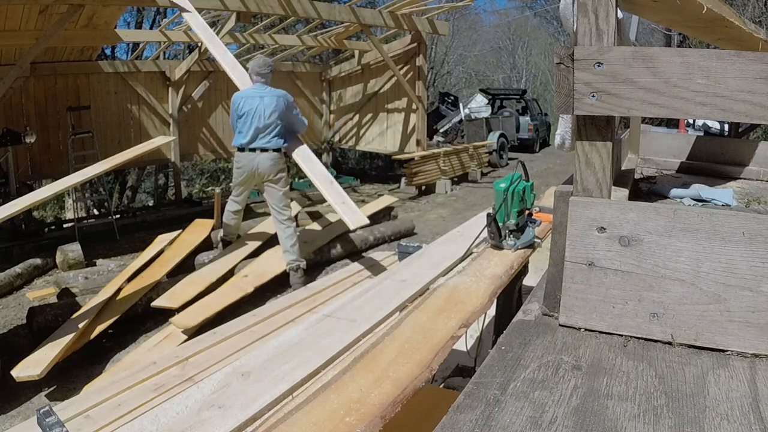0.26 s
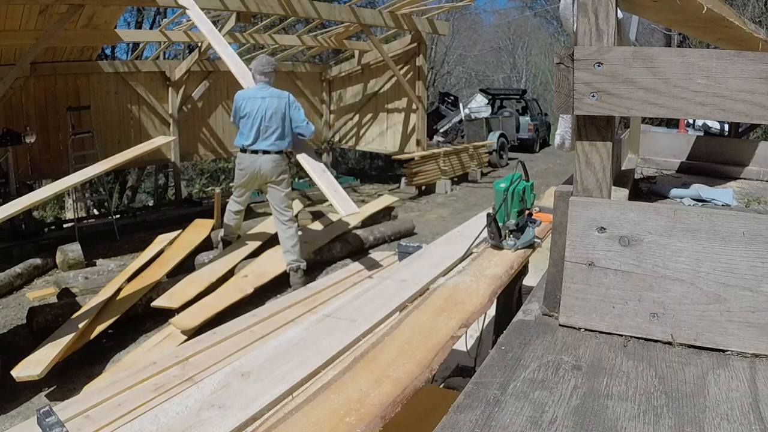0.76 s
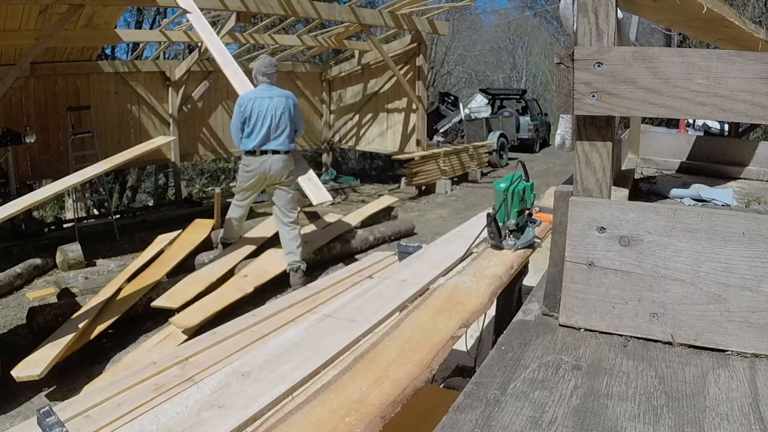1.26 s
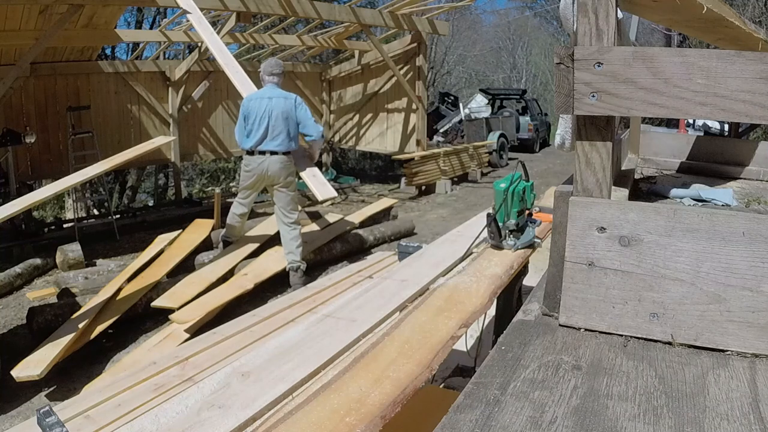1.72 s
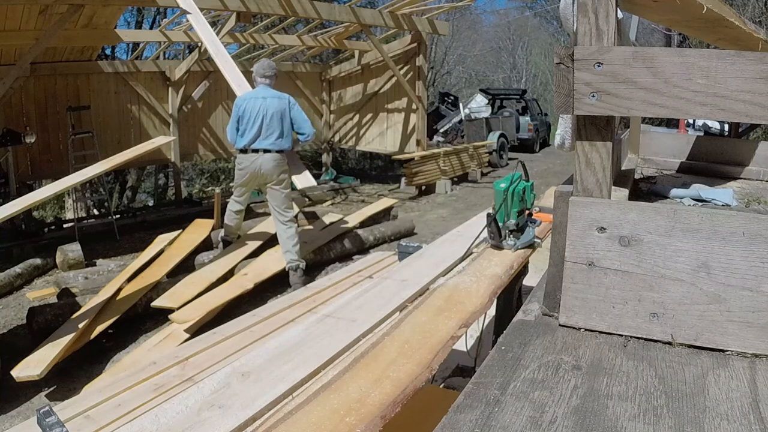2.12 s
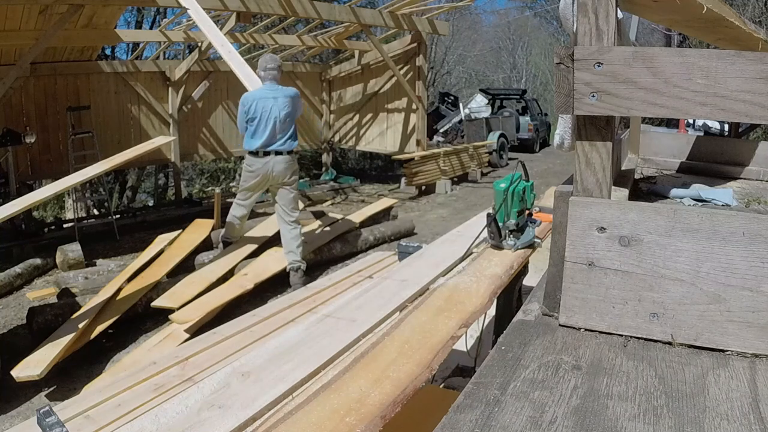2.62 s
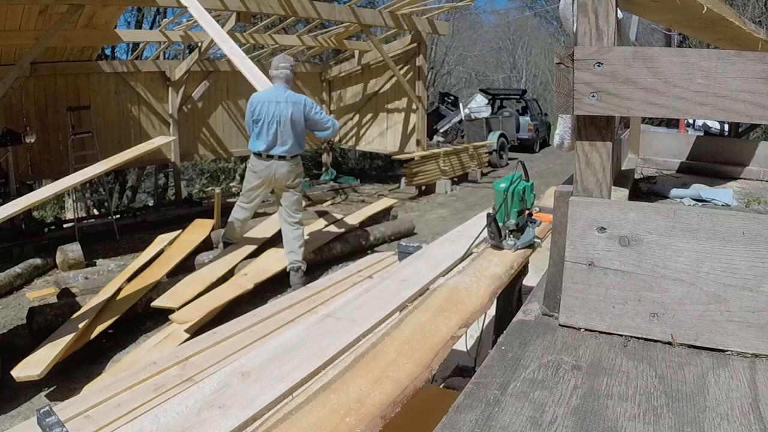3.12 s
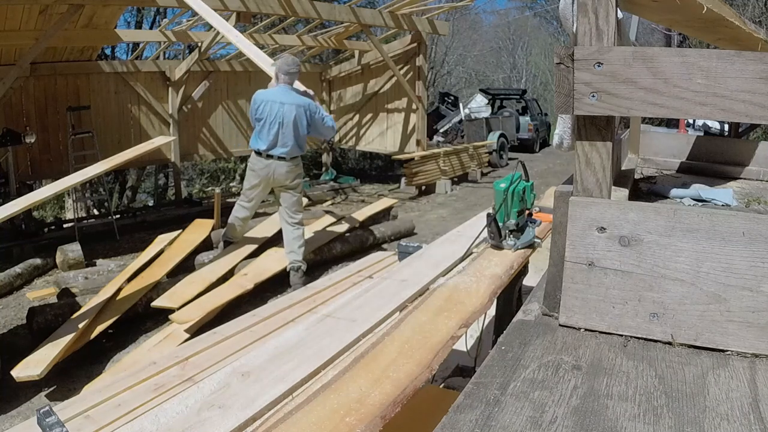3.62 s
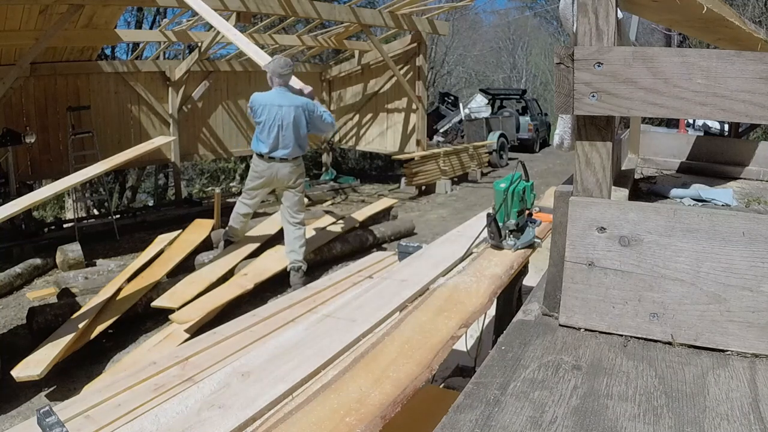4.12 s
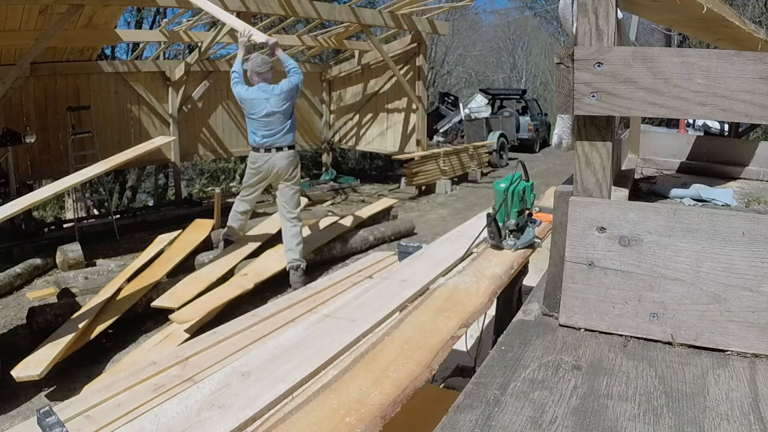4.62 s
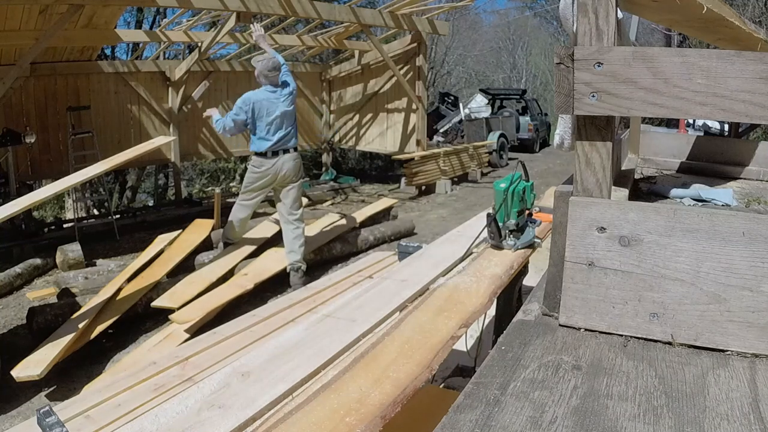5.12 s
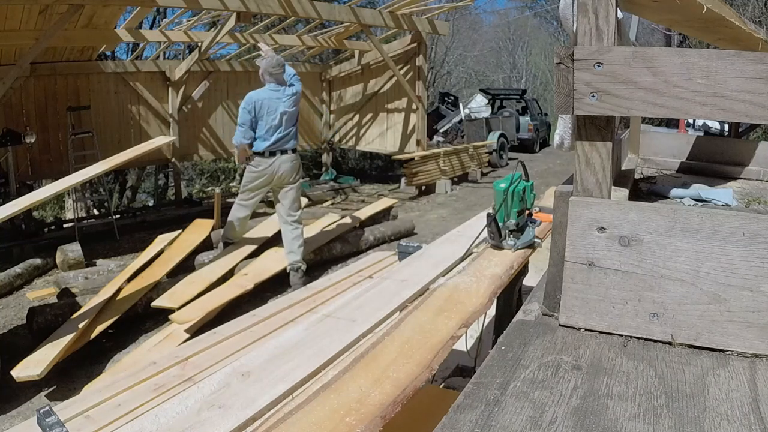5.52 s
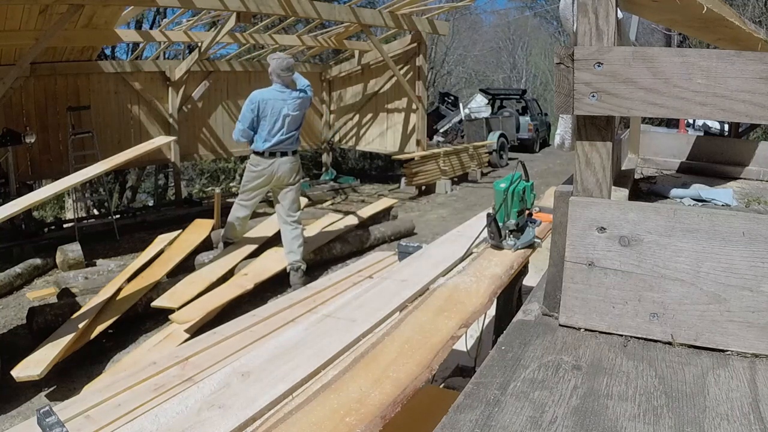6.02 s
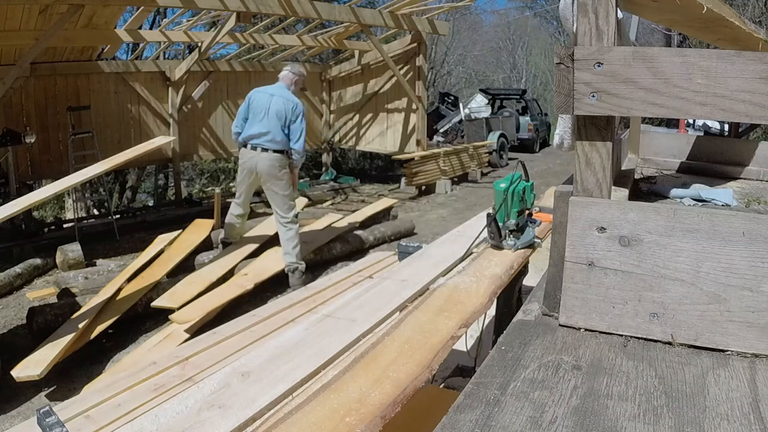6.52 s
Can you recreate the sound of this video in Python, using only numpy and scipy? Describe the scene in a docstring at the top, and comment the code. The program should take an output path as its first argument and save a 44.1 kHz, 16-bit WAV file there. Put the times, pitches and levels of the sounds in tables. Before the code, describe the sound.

A long rough board bumps softly against timber, then is shoved along a wooden frame in three short, rasping pushes. A deep, soft thud sounds three times as it sags onto its support. Near the end it drops with a loud crack, bounces on other boards and is knocked again in a quick clatter. The place is outdoors, with a faint hush and a low hum behind the wood.

```python
"""An outdoor building site: a long rough-sawn board is shoved onto a timber frame in three pushes.
Stick-slip friction of its fibres makes the scraping. Impacts excite its bending modes and the pile
beneath: it bumps softly at first, then drops with a crack, bounces on the other boards and is knocked
once more. Three times it sags onto its support with a deep thud. Behind it lie a faint outdoor hush,
a low hum and one brief rustle."""
import sys
import numpy as np
from scipy import signal
from scipy.io import wavfile

SR = 44100
rng = np.random.default_rng(int(sys.argv[2]) if len(sys.argv) > 2 else 0)


def digitize_waveform(pressure):
    """Quantize a signal to 16-bit integers and store it at the path in sys.argv[1].

    Rows of a 2-D input are taken as channels; values are limited to [-1, 1].
    """
    field = np.atleast_2d(pressure).T
    bounded = np.clip(field, -1, 1)
    quanta = np.round(bounded * 32767).astype(np.int16)
    wavfile.write(sys.argv[1], SR, quanta)


N = 298116
TIME = np.arange(N) / SR
EDGES = 22 * 2 ** (np.arange(39) / 4)   # quarter-octave bands, f/Hz
CENTRES = np.sqrt(EDGES[1:] * EDGES[:-1])
# boundaries between the bass, middle, clack and splinter registers: f/Hz
CROSSOVERS_HZ = [547, 1730, 3930]


def from_db(db):
    """Amplitude ratio of a level in decibels."""
    return 10 ** (np.asarray(db) / 20)


def rms_one(x):
    """Normalisation to unit rms along time."""
    return x / np.sqrt(np.mean(x ** 2, axis=-1, keepdims=True) + 1e-20)


def at_hz(points, hz):
    """Interpolation on a logarithmic frequency axis."""
    known_hz, value = np.transpose(points)
    return np.interp(np.log(hz), np.log(known_hz), value)


def drift(rate):
    """Random modulation of unit rms, with `rate` new values a second."""
    knots = rng.standard_normal(int(N / SR * rate) + 2)
    return rms_one(np.interp(TIME * rate, np.arange(len(knots)), knots))


def split(pair):
    """Quarter-octave filter bank, unit rms per band; neighbours take uncorrelated inputs."""
    filters = [signal.butter(2, edge, "band", fs=SR, output="sos") for edge in zip(EDGES, EDGES[1:])]
    return rms_one(np.array([signal.sosfilt(sos, pair[k % 2]) for k, sos in enumerate(filters)]))


def band_gains(spectrum):
    """Band power is spectral density times bandwidth; the total is scaled to 1."""
    gain = from_db(at_hz(spectrum, CENTRES)) * np.sqrt(CENTRES)
    return gain / np.linalg.norm(gain)


def registers(x, edges_hz):
    """Crossover filtering into registers, from bass to treble."""
    edges = [12, *edges_hz, .45 * SR]
    filters = [signal.butter(5, band, "band", fs=SR, output="sos") for band in zip(edges, edges[1:])]
    return np.array([signal.sosfilt(sos, x) for sos in filters])


def board_ring(modes, t, scatter_db):
    """Modal superposition: damped sinusoids, their random strengths standing for the contact point."""
    hz, db, t60 = np.transpose(modes)[:, :, None]
    gain = from_db(db + scatter_db * rng.standard_normal(hz.shape))
    waves = np.sin(2 * np.pi * (hz * t + rng.random(hz.shape)))
    build_up = 1 - np.exp(-(t / .001) ** 2)
    return build_up * np.sum(gain * waves * from_db(-60 * t / t60), axis=0) / np.linalg.norm(gain)


def hush(level_db):
    """Stationary outdoor noise whose spectral density falls towards the treble."""
    # ambient spectrum: f/Hz, relative density level/dB
    spectrum = [(20, -10), (38, -5.5), (64, -6), (82, -5.5), (110, -7.5), (150, -7.5), (205, -8),
                (270, -12), (550, -16), (1040, -16), (1540, -24.5), (2400, -26), (4200, -34.5), (6500, -37),
                (15500, -57.5)]
    return from_db(level_db) * (band_gains(spectrum) @ split(rng.standard_normal((2, N))))


def hum(hz, level_db, waver_db):
    """A far tone wavers by slow frequency and amplitude modulation."""
    phase = 2 * np.pi * np.cumsum(hz + 0.77 * drift(5.2)) / SR
    return from_db(level_db + waver_db * drift(5.2)) * np.sqrt(2) * np.sin(phase)


def rustle(at_s, half_width_s, band_hz, level_db):
    """Band-limited noise under a bell-shaped envelope: a brief, dry brush."""
    hiss = signal.sosfilt(signal.butter(2, band_hz, "band", fs=SR, output="sos"), rng.standard_normal(N))
    return from_db(level_db) * rms_one(hiss) * np.exp(-((TIME - at_s) / half_width_s) ** 2)


def sags(hz, t60_s, attack_s, shudder_db):
    """Damped flexural vibration: the whole length swings in a low mode and shudders on its support."""
    # deep thuds: t/s, level/dB before attack and shudder
    thuds = [(.481, -36), (2.471, -31.5), (4.929, -30)]
    s, db = np.transpose(thuds)[:, :, None]
    t = np.maximum(TIME - s, 0)
    swing = np.sin(2 * np.pi * hz * t) * (1 - np.exp(-t / attack_s))
    return np.sum(swing * from_db(db - 60 * t / t60_s), axis=0) * from_db(shudder_db * drift(60))


def push_envelopes(s, attack_s, hold_s):
    """Friction noise follows the load: it builds, grows heavier and duller, then decays exponentially."""
    # response of bass, middle and treble: rise in the attack/dB, swell in the hold/dB, fade/(dB/s)
    response = [(14, 4.5, 83), (20, 2, 143), (20, -2, 109)]
    rise_db, swell_db, fade_db_per_s = np.transpose(response)[:, :, None]
    t = TIME - s
    building = np.maximum(1 - t / attack_s, 0)
    bearing = np.clip((t - attack_s) / hold_s, 0, 1)
    eased_s = np.maximum(t - attack_s - hold_s, 0)
    return from_db(swell_db * bearing - rise_db * building - fade_db_per_s * eased_s)


def scrapes(catches_per_s, catch_spread_db, judder_db):
    """Stick-slip friction: rough fibres catch and let go in dense impulses that drive the board."""
    # pushes, the second in two shoves: t/s, attack/s, hold/s, then as the attack ends:
    # middle level/dB, bass re middle/dB, treble re middle/dB
    pushes = [(0.766, 0.2, .07, -36.5, -1.5, -5.5), (2.045, 0.17, 0.12, -28.5, -5, -5.5),
              (2.352, 0.088, 0.047, -36.5, -6.5, -6), (4.321, 0.32, 0.24, -26.5, -6, -12.5)]
    # spectra of the three stretches of board being rubbed: f/Hz, relative density level/dB
    first = [(50, -23), (105, 0.5), (190, -14), (275, 0), (460, -21), (620, -4.5), (1130, -10.5),
             (1500, -17.5), (2500, -15), (3300, -28.5), (4300, -34), (5600, -33), (8000, -48), (15000, -68)]
    second = [(50, -36), (115, -1), (200, -7), (280, -12), (480, -6), (850, 1), (1150, -1.5), (1550, -14.5),
              (2000, -7), (2550, -7.5), (3300, -23), (4300, -29.5), (5600, -29), (8000, -49), (15000, -72)]
    third = [(50, -35), (115, -10), (190, -5), (360, -5), (540, -9.5), (750, -7.5), (1150, -4),
             (1550, -19.5), (1950, -10.5), (3000, -21.5), (4300, -30.5), (5100, -29.5), (8000, -43),
             (15000, -67)]
    # modes of the sliding board, held at one end: f/Hz, relative level/dB, T60/s
    held_modes = [(112.8, -11, 0.68), (241, -6.5, 0.32), (282.9, 0, 0.61), (333, -13, 0.2), (366, 3.5, 0.2),
                  (445, -12, 0.38), (675, -12, 0.51), (731.4, -2, 0.23), (783, -18, 0.12), (889, -6, 0.33),
                  (950, -1, 0.047), (1088, -3, 0.26), (1190, -3.5, 0.16), (1250, -5.5, 0.24),
                  (1303, -12, 0.14), (1940, 5, 0.046), (2420, -11, 0.3)]
    sizes = from_db(catch_spread_db * np.minimum(rng.exponential(1, size=(3, N)), 4))
    sizes *= rng.choice([-1, 1], size=(3, N))
    slips = sizes * (rng.random(sizes.shape) < catches_per_s / SR) * from_db(judder_db * drift(70))
    bands, out = split(slips), np.zeros(N)
    impulse_response = board_ring(held_modes, TIME[:SR], scatter_db=1.5)
    ring = rms_one(signal.fftconvolve(slips[-1], impulse_response)[:N])
    for (s, attack_s, hold_s, db, bass_db, treble_db), rasp in zip(pushes, [first, second, second, third]):
        parts = rms_one(registers(band_gains(rasp) @ bands + ring, CROSSOVERS_HZ[:2]))
        gains = from_db(db + np.array([bass_db, 0, treble_db]))
        out += gains @ (parts * push_envelopes(s, attack_s, hold_s))
    return out


def contacts(loss_db, rebound_bass_db, longer_ms):
    """Inelastic rebound: after each blow the board lands again, weaker and with a longer contact."""
    # board striking timber: t/s, middle level/dB, bass re middle/dB, contact/ms, rebound/s, thump f/Hz
    impacts = [(.344, -44.5, 5.5, 0.089, .02, 283), (.384, -34, 8.5, 0.56, 0.024, 277),
               (.427, -37, 3, 0.75, .054, 293), (.737, -50.5, 4.5, 0.22, .04, 276),
               (.941, -39, 6, .2, .025, 272), (1.287, -45.5, 6.5, 0.67, .04, 222),
               (2.022, -44, 6, 0.23, .025, 271), (4.018, -52, -8, 1.0, .012, 400),
               (4.444, -41.5, 6.5, 0.54, .015, 357), (4.636, -29.5, -10, 1.4, 0.013, 404),
               (4.755, -40, 11.5, .8, .03, 364), (5.460, -16, -9, 0.076, .025, 403.4),
               (5.4648, -15.5, -5, 1.2, .032, 403.6), (5.702, -24.5, -3.5, 0.12, .022, 443),
               (5.735, -30, 8.5, 0.72, 0.023, 391), (5.798, -22, 1.5, 1.3, .014, 309),
               (5.886, -21, -1, 1.4, 0.055, 401.4), (6.082, -27.5, -7.5, 1.1, .014, 390),
               (6.192, -51, 14.5, 0.79, .05, 322.5), (6.426, -51, 2.5, 0.81, .03, 452),
               (6.530, -52, 5.5, .5, .02, 381), (6.582, -22, -4.5, 0.28, .022, 394),
               (6.62, -27, 2.5, 0.39, .012, 353), (6.674, -17.5, -8, .85, 0.021, 293)]
    for s, db, bass_db, contact_ms, rebound_s, thump_hz in impacts:
        crack_db = 2.5 - bass_db   # bass-heavy blows crack less
        yield s, db, bass_db, contact_ms, crack_db, thump_hz
        yield s + rebound_s, db - loss_db, rebound_bass_db, contact_ms + longer_ms, crack_db, thump_hz


def blows(ring_db, snap_db, crack_s, spread_s, thump_t60_s):
    """Impact excitation: a snap, a crack and a hollow thump, then free vibration of board and pile."""
    # modes of the board lying loose: f/Hz, relative level/dB, T60/s
    loose_modes = [(102.4, -9, 1), (177, -10, 0.86), (227.1, -8, 0.66), (234.3, -4, 0.29),
                   (275.8, -1.5, 0.28), (309.4, -5.5, 0.76), (397.4, -12, 0.4), (443, -10.5, 0.47),
                   (518, -6, 0.57), (606, -35, 0.48), (706, -2.5, 0.28), (766, 0, 0.37), (879, 1.5, 0.16),
                   (1000, 4.5, 0.36), (1070, -3, 0.34), (1098, -2, 0.15), (1125, -5, 0.11), (1183, -1, .3),
                   (1220, -31, .3), (1290, -3.5, 0.36), (1580, -22, .3), (1880, -17.5, 0.18),
                   (2320, 5, 0.25), (2160, -18, .22), (2070, -12, 0.59), (2640, -32, .25)]
    # heavily damped first wave from the contact: f/Hz, relative level/dB, T60/s
    snap_modes = [(374, -16, 0.055), (983, -3.5, 0.017), (1119, -5.5, 0.029), (2046, 7.5, 0.0059),
                  (2780, -2.5, 0.0041), (4890, -33.5, 0.004)]
    # dense, weaker resonances of the pile: f/Hz, relative density level/dB
    pile_spectrum = [(25, -10), (60, -3.5), (110, -5), (250, -5), (400, 2), (530, -7), (800, -2.5),
                     (1200, -2.5), (1600, -13.5), (2300, -0.5), (3200, -14.5), (4300, -12), (5600, -13.5),
                     (8000, -45), (15000, -74)]
    # their decay: f/Hz, T60/s
    pile_decay = [(80, 0.95), (250, 0.7), (600, 0.41), (1500, 0.34), (4000, 0.27), (10000, 0.69)]
    t, out = np.arange(int(.7 * SR)) / SR, np.zeros(N + SR)
    attack = slice(0, SR // 25)   # the first 40 ms set each register's level
    # dispersion: high bending waves travel faster, so bass builds up last and treble cracks shortest
    slowness = np.sqrt(1000 / CENTRES[:, None])
    rise = band_gains(pile_spectrum)[:, None] * (1 - np.exp(-(t / (spread_s * slowness)) ** 2))
    tail = rise * from_db(-60 * t / at_hz(pile_decay, CENTRES)[:, None])
    crack_tilt = at_hz([(100, 0.17), (900, 0.35), (2200, 0.87), (6000, 1.2)], CENTRES)[:, None]
    crack = rise * np.exp(-t / (crack_s * slowness)) * crack_tilt
    snap = sum(from_db(db) * np.sin(2 * np.pi * hz * t) * from_db(-60 * t / t60)
               for hz, db, t60 in snap_modes)
    onset = 1 - np.exp(-(t / spread_s) ** 2)
    bands = split(rng.standard_normal((2, N)))
    landings = contacts(loss_db=9, rebound_bass_db=1, longer_ms=0.23)
    for s, level_db, bass_db, contact_ms, crack_db, thump_hz in landings:
        start = rng.integers(N - len(t))
        pile = np.sum((tail + from_db(crack_db) * crack) * bands[:, start:start + len(t)], axis=0)
        ring = from_db(ring_db) * board_ring(loose_modes, t, scatter_db=5.5)
        board = ring + from_db(snap_db + crack_db) * snap
        parts = registers(pile + onset * board, CROSSOVERS_HZ)
        parts /= parts[:, attack].std(axis=1, keepdims=True)
        # the span between contact and support flexes briefly
        thump = np.sin(2 * np.pi * thump_hz * t) * from_db(-60 * t / thump_t60_s) * onset
        thump_db = -3 + 0.56 * bass_db   # re the rest of the bass
        parts[0] += from_db(thump_db) * thump / thump[attack].std()
        parts[0] /= parts[0, attack].std()
        # a longer contact dulls the two upper registers
        clack_db = -7 - 16 * contact_ms
        splinter_db = -18 - 35.5 * contact_ms
        gains = from_db(level_db + np.array([bass_db, 0, clack_db, splinter_db]))
        at = int((s - .0012) * SR)
        out[at:at + len(t)] += gains @ parts
    return out[:N]


def scene():
    """Linear superposition of board and background in one channel."""
    knocks = blows(ring_db=0.5, snap_db=10.0, crack_s=0.0059, spread_s=0.0018, thump_t60_s=0.17)
    sliding = scrapes(catches_per_s=4500, catch_spread_db=3.0, judder_db=1.0)
    brush = rustle(at_s=.592, half_width_s=.016, band_hz=(4800, 8200), level_db=-61)
    background = hush(level_db=-45) + hum(hz=67.7, level_db=-50.5, waver_db=2.0)
    thuds = sags(hz=113.3, t60_s=0.69, attack_s=0.022, shudder_db=5)
    return (background + brush + thuds + sliding + knocks)[None]


def record(dry):
    """Soft saturation rounds the loudest peaks; a low-pass filter cuts above 15.4 kHz."""
    rounded = dry / (1 + dry ** 10) ** (1 / 10)
    return signal.sosfilt(signal.ellip(10, .1, 90, 15400, fs=SR, output="sos"), rounded)


dry = scene()
out = record(dry)
digitize_waveform(out)
```